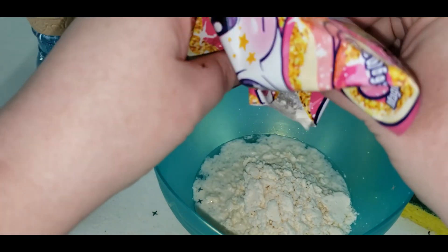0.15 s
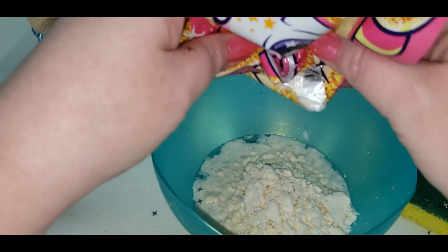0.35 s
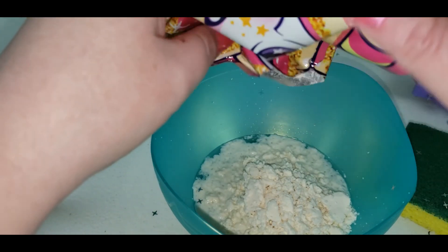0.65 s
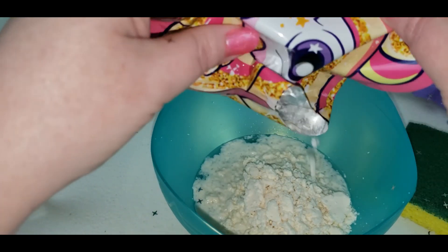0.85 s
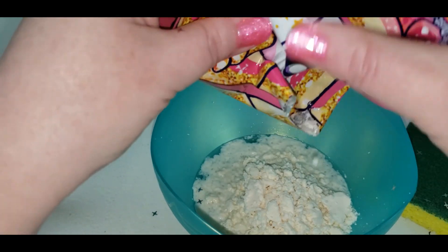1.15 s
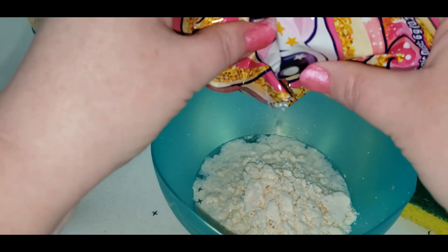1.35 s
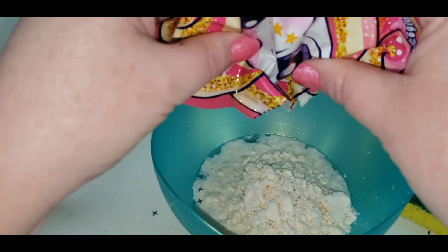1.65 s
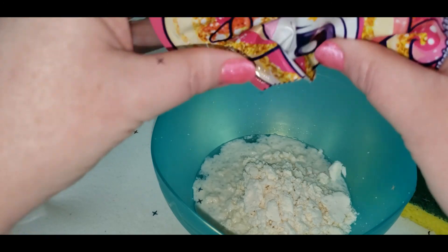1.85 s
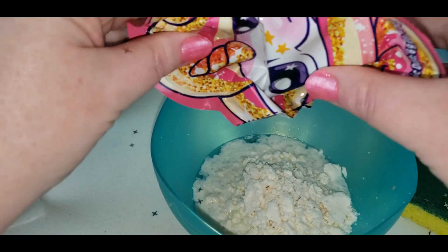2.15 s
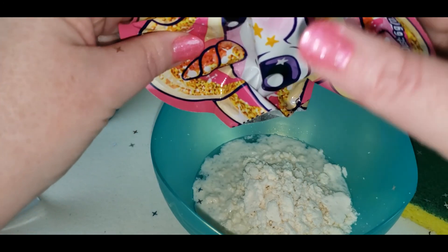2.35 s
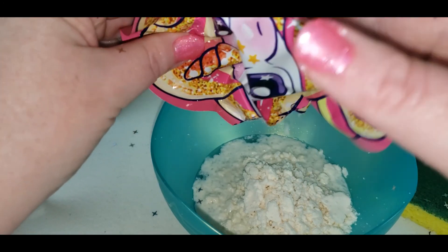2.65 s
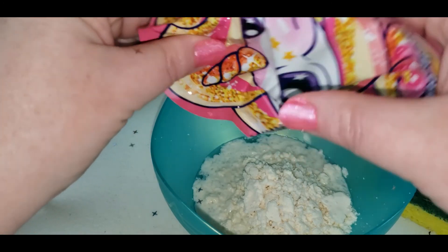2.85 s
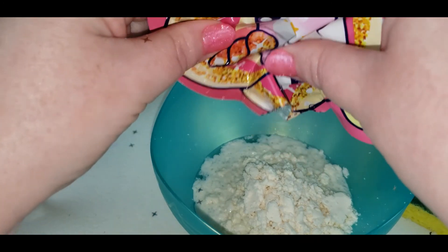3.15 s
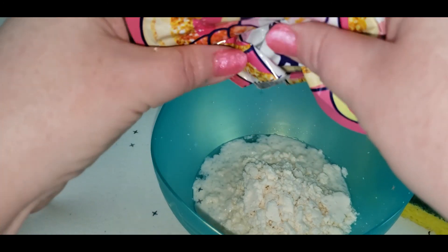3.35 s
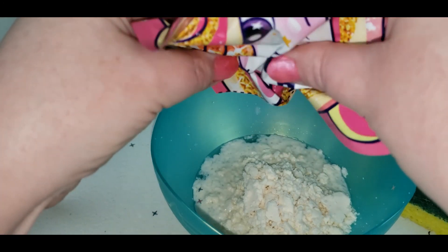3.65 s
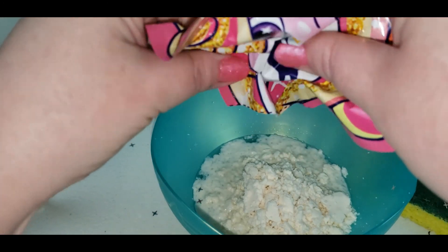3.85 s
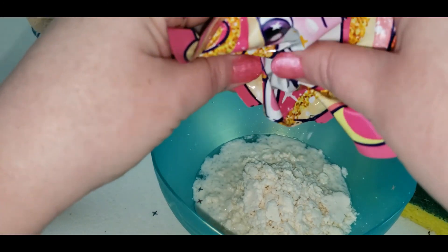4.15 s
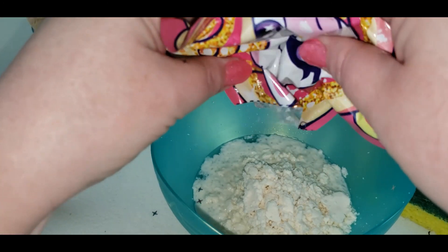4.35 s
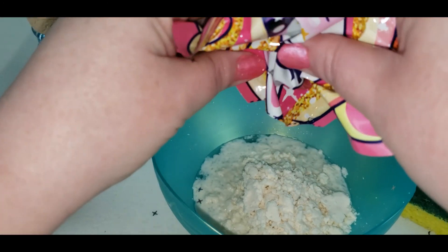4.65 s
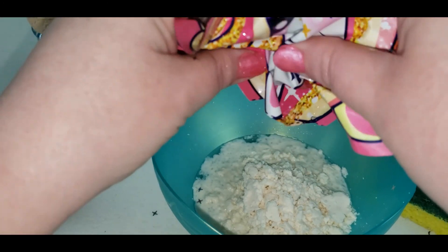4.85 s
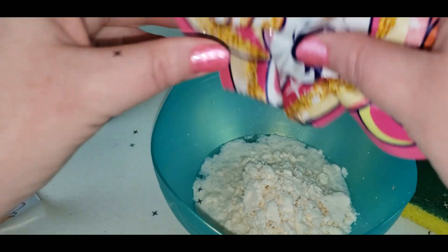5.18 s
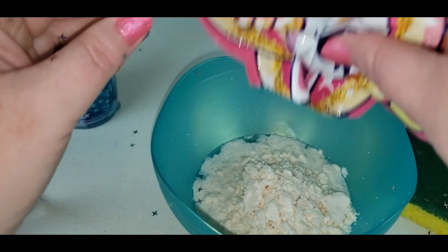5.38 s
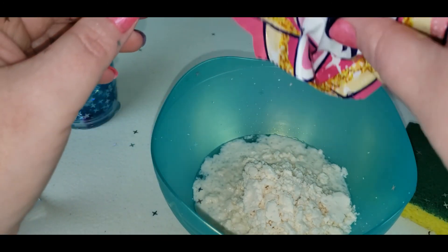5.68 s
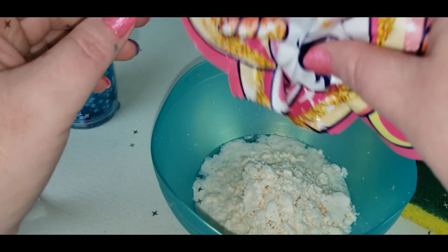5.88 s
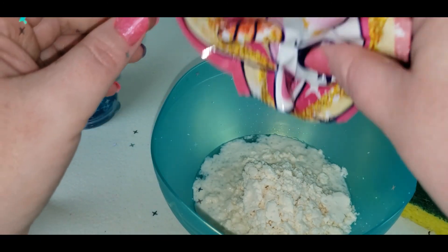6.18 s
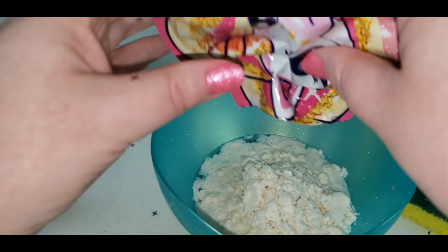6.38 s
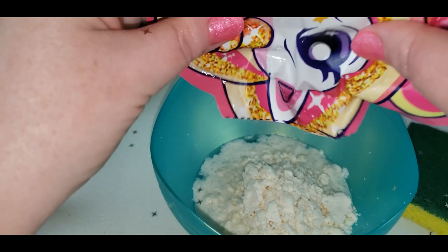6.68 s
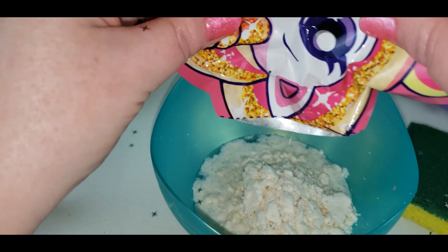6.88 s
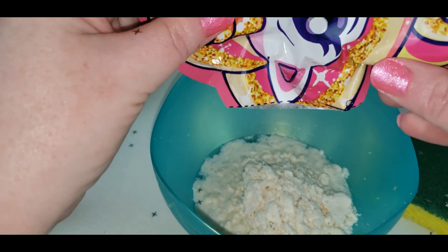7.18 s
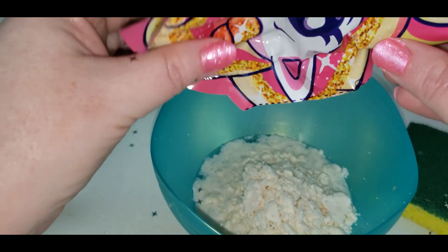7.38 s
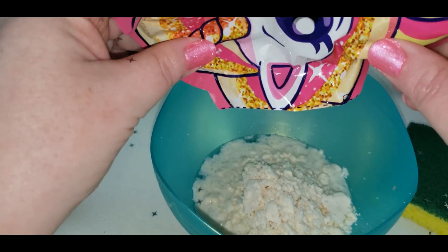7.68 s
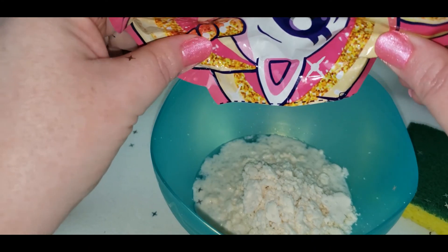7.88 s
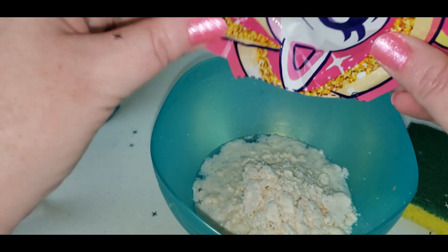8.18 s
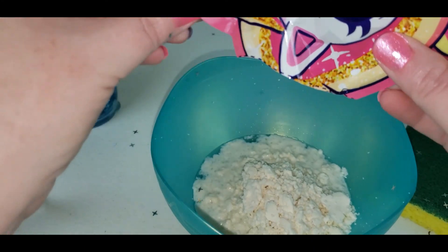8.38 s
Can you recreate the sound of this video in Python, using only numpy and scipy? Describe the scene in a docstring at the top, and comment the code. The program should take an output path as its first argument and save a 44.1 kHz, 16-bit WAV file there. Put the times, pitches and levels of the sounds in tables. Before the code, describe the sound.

Close, crisp crinkling of a plastic pouch in uneven bursts, building to dense crackling, then pausing and returning as scattered snaps in a small room.

```python
"""A foil-lined plastic sachet is squeezed and shaken by two hands over a plastic bowl, close by, in a small
room. Creases snap at set times, loud ones and faint lone ones, as runs of slips that ring the film; small ones
join in. Random ticks and a soft hiss make the fine crinkle, and film slides over film in quick zips of run-
together ticks. Fingers knock on the taut pouch, and once on the bowl, in short rings; the pouch thumps softly
as puffs of low noise, and palms rub it. Noise-like echoes answer from bowl, table and room, over steady
coloured background noise and faint mains hum."""
import sys
import numpy as np
from scipy import signal
from scipy.fft import rfft, irfft
from scipy.io import wavfile

SR = 44100
rng = np.random.default_rng(int(sys.argv[2]) if len(sys.argv) > 2 else 0)


def generate_wav(sig):
    """Save sig (samples, or channels by samples) to the path in sys.argv[1] as 16-bit PCM at SR."""
    pcm = np.round(np.clip(np.atleast_2d(sig).T, -1, 1) * 32767).astype(np.int16)
    wavfile.write(sys.argv[1], SR, pcm)


N = 376173
TIME = np.arange(N) / SR


def from_db(db):
    """Turn decibels into a gain."""
    return 10 ** (np.asarray(db) / 20)


def rms_one(x):
    """Scale a sound to unit power."""
    return x / np.sqrt(np.mean(x ** 2) + 1e-20)


def band(x, low_hz, high_hz, order=2):
    """Keep only the pitches between two limits."""
    limits = [low_hz, min(high_hz, SR / 2 - 100)]
    return signal.sosfilt(signal.butter(order, limits, "band", fs=SR, output="sos"), x)


def resonate(x, hz, width_hz):
    """Ring at one pitch, with gain 1 at the peak; a narrower width rings longer."""
    r = np.exp(-np.pi * width_hz / SR)
    top = np.array([1, 0, -1]) * (1 - r * r) / 2
    bottom = [1, -2 * r * np.cos(2 * np.pi * hz / SR), r * r]
    return signal.lfilter(top, bottom, x + 1e-18)


def coloured_noise(spectrum, size):
    """Make noise of unit power whose spectrum follows a table of pitch and level."""
    hz, db = np.transpose(spectrum)
    bins = np.maximum(np.fft.rfftfreq(size, 1 / SR), 1)
    gain = from_db(np.interp(np.log(bins), np.log(hz), db))
    return rms_one(irfft(rfft(rng.standard_normal(size)) * gain, size))


def add(out, s, sound):
    """Mix a sound in at its time in seconds."""
    start = int(np.clip(round(s * SR), 0, N - 1))
    out[start:start + len(sound)] += sound[:N - start]


# Creases that snap at set times, loud ones and faint lone ones;
# hollow body and sharp edge are relative to level_db, before a shared trim:
# start_s, level_db, pitch_hz, hollow_body_db, sharp_edge_db
PLACED_CREASES = [(0.0186, -32.5, 2590, -15, -11.5), (0.0384, -30, 3990, -16.5, -16.5),
                  (0.055, -24, 4030, -19, -4.5), (0.0816, -29, 4690, -26, -9.5),
                  (0.0993, -23.5, 5380, -15, -6), (0.1448, -29.5, 3350, -9, 2),
                  (0.2616, -24, 4050, -12, -7), (0.2879, -32, 4210, -6.5, -15.5),
                  (0.3194, -30.5, 4040, -6, -10), (0.3325, -19.5, 5000, -24.5, -10.5),
                  (0.3524, -20.5, 6000, -27.5, -7), (0.3737, -30.5, 5290, -22.5, -5),
                  (0.3873, -21, 5510, -18.5, -16), (0.4347, -31, 2240, -1, -34),
                  (0.5735, -32.0, 4150, -8, -31.5), (0.621, -42, 2590, 3.5, -21.5),
                  (0.7047, -25.5, 2770, -12, -19), (0.744, -32.5, 2550, -8, -14.5),
                  (0.756, -42, 2950, -12, 7), (0.7992, -21.5, 3690, -9, -7),
                  (0.814, -20, 2850, -15.5, -7.5), (0.9307, -30.5, 4170, -14, -7.5),
                  (0.9833, -26.5, 2810, -11.5, -18), (1.0147, -21, 4580, -9, -10),
                  (1.072, -32.5, 3790, -24, -24), (1.1168, -34.5, 3510, -12, 1),
                  (1.1307, -30, 3250, -18, -27), (1.235, -30, 5250, -9.5, -7.5),
                  (1.2533, -29.5, 4300, -22.5, -11), (1.2856, -23, 3680, -33.5, -23),
                  (1.2983, -30.5, 3400, -11, -24), (1.3287, -27.5, 3500, -20, -4.5),
                  (1.3884, -20, 3500, -14, -12.5), (1.4178, -18, 3900, -8, -8),
                  (1.4282, -15.5, 3640, -22.5, -8), (1.4701, -24, 3750, -11.5, -13),
                  (1.4834, -36, 4560, -14.5, -9), (1.5345, -30, 3800, -11, -18),
                  (1.5663, -25, 4320, -28, -5.5), (1.7338, -26, 3790, -17.5, -12),
                  (1.7533, -31.5, 4260, -11.5, -3), (1.7716, -34, 3570, -10, -11.5),
                  (1.8121, -31.5, 3600, -13, -16), (1.8349, -35, 4140, -10.5, -12),
                  (1.8771, -38.5, 2830, -10.5, -17), (1.941, -25, 5730, -19, -18),
                  (2.0017, -30.5, 4200, -15, -31), (2.0142, -33, 3880, -10.5, -26),
                  (2.0618, -28.5, 4850, -9, -38), (2.1062, -28, 3860, -17, -8.5),
                  (2.2147, -46, 2510, -2.5, -12), (2.4588, -40.5, 4820, -27, -10),
                  (2.4843, -14, 4280, -18, -11), (2.552, -35.5, 4760, -19, -1),
                  (2.6346, -38.5, 4730, -6.5, -12), (2.6913, -29.5, 4220, -15.5, -28),
                  (2.8184, -28, 3180, -9, -28), (2.9744, -20, 3880, -16, -19),
                  (2.9906, -37.5, 4150, -23, -4), (3.09, -29.5, 3460, -11.5, -2),
                  (3.1013, -30, 3870, -27, -12.5), (3.1141, -20.5, 4910, -36, -3.5),
                  (3.1591, -26.5, 4960, -16.5, -4), (3.2087, -32.5, 4860, -13.5, -24.5),
                  (3.2702, -37.5, 3120, -6.5, 1), (3.2921, -25.5, 3970, -11, -22),
                  (3.3068, -29, 3610, -11.5, -10), (3.327, -18, 3430, -13.5, -26.5),
                  (3.3637, -18.5, 3690, -16.5, -9), (3.3839, -23.5, 2570, -10.5, -7.5),
                  (3.4443, -19, 4750, -14.5, -27.5), (3.4612, -20, 4850, -17, -12),
                  (3.4806, -19.5, 4340, -15.5, -8.5), (3.5211, -32.5, 3010, -3, -10.5),
                  (3.562, -29, 4460, -6, -4), (3.578, -22, 4170, -8.5, -16.5),
                  (3.6069, -24.5, 3870, -6, -10), (3.6278, -25, 5320, -13.5, -8.5),
                  (3.6686, -19, 4450, -12.5, -13.5), (3.6935, -19.0, 3590, -12.5, -5.5),
                  (3.7151, -23.5, 4290, -14.5, -16.5), (3.732, -15.5, 4010, -21.5, -29),
                  (3.7657, -22, 4060, -14, -9.5), (3.7891, -29.5, 4280, -19, -8),
                  (3.8533, -27.5, 4940, -29, 1), (3.8682, -24, 3930, -25.5, -19),
                  (3.892, -24.5, 5250, -31.5, -2.5), (3.9099, -13, 3930, -30.5, -14),
                  (3.9429, -20.5, 4610, -7, -5.5), (4.0525, -18.5, 3580, -14.5, -20),
                  (4.0633, -29.0, 4210, -19, -1.5), (4.076, -16, 5860, -26, -3),
                  (4.0998, -25, 4020, -24.5, -12.5), (4.115, -20, 3830, -8.5, -15),
                  (4.1562, -22.5, 4240, -30, -5), (4.184, -30, 4590, -23, 2.5),
                  (4.2267, -22, 4640, -45.5, -4.5), (4.243, -24.0, 4040, -36, -0.5),
                  (4.3221, -16, 3500, -28, -8), (4.3433, -22, 4310, -28, -10.5),
                  (4.3682, -18, 3660, -17.5, -7.5), (4.4182, -32.5, 4720, -19.5, -9),
                  (4.4497, -24.5, 4450, -22.5, -7.5), (4.464, -35.5, 5080, -19, -3.5),
                  (4.4973, -16, 4420, -15.5, -10), (4.515, -21, 3230, -21, 3),
                  (4.5298, -20.5, 4860, -26, -2.5), (4.548, -18.5, 2960, -32, 0),
                  (4.6488, -28, 5230, -46, -0.5), (4.663, -32.5, 3110, -15, 0),
                  (4.731, -21, 4330, -15.5, -5), (4.746, -24, 4480, -26, -14), (4.777, -29, 4210, -33, -1),
                  (4.8098, -22.5, 3310, -16, -15), (4.8197, -27.5, 3760, -24, -1.5),
                  (4.851, -33, 3330, -24, 10), (4.9965, -30, 5060, -20, -21), (5.0135, -34.5, 3020, -5, 1),
                  (5.0422, -27, 4640, -27, -14), (5.4598, -60.5, 3410, -11, -16),
                  (5.9328, -39, 4830, -22.5, -20), (5.9675, -37.5, 2720, -7.5, -7),
                  (6.2084, -65.5, 2550, 4.5, -31), (6.2568, -51, 3750, -5, -4),
                  (6.2688, -55, 2880, -8, -11), (6.353, -55, 3780, -16, -16),
                  (6.4095, -27, 3960, -18.5, -11), (6.4898, -26, 3920, -15, -7.5),
                  (6.5255, -30, 5010, -12, -6), (6.5411, -20.5, 4650, -13, -9.5),
                  (6.6535, -37, 5040, -5, -13), (6.6641, -30.5, 3460, -8, -12),
                  (6.696, -32.5, 3260, 1.5, 6.5), (6.7635, -17.5, 4010, -12, -5),
                  (6.8713, -40, 2240, 5, -35), (7.2216, -30, 3590, -16, -17),
                  (7.2445, -37, 3940, -8.5, -1.5), (7.4743, -53, 6090, -19, -3),
                  (7.5103, -46, 4140, -10.5, -8), (7.6062, -54.5, 5130, -7, 3),
                  (7.6349, -29, 5390, -18, -10), (7.6529, -29, 4420, -16.5, -21),
                  (7.7285, -23.5, 5920, -16.5, -3.5), (7.7393, -28.5, 3880, -5, -6),
                  (7.892, -51.5, 3350, -2.5, -36), (7.9458, -58, 2000, 2, -39),
                  (7.9552, -41.5, 3050, -2, -9), (8.0503, -33, 4060, -29, -23),
                  (8.0995, -45, 2990, -2, -8.5), (8.1081, -34.5, 3680, -13, -15),
                  (8.1189, -30, 4080, -19, -19), (8.213, -54.0, 3500, -19, -14),
                  (8.2726, -53.5, 4100, -21, -20), (8.3115, -42, 4170, -7, -37),
                  (8.3792, -47, 3700, -0.5, -26), (8.5189, -57, 2630, 0.5, -25)]
STRAIN_S = .0035   # time over which a crease creaks before it gives way
RUN_SPREAD_DB = 4.5   # scatter in the length of a run of slips


def snaps(creases, slip_s=0.0017, first_slip=.75, slips_per_s=26000, scatter_db=-8.5, scatter_s=0.0068,
          strain_db=-23, sag_db=-7.5, sag_s=0.00081, snap_s=0.0035, body_db=-2.0, edge_db=-2.0,
          dulling=.25, firm_db=-25, size=1400):
    """A crease creaks, then gives way in a run of slips that shake its facet, the pouch and the film's edge."""
    lead = size // 4
    t, out = (np.arange(size) - lead) / SR, np.zeros(N)
    draws = rng.standard_normal((len(creases), 3, size))
    slip_noise, body_noise, chance = draws[:, 0], draws[:, 1], draws[:, 2]
    slipping = rng.random((len(creases), size)) < slips_per_s / SR
    run_s = slip_s * from_db(RUN_SPREAD_DB * np.clip(chance[:, :1], -2, 2))
    # the folds and hands scatter each snap differently, as their shape keeps changing
    scattered = from_db(scatter_db) * np.exp(-abs(t) / scatter_s)
    fading = (t >= 0) * (np.exp(-abs(t) / run_s) + scattered)
    straining = (t < 0) * from_db(strain_db) * np.exp(-abs(t) / STRAIN_S)
    slips = slip_noise * slipping * (fading + straining)
    slips[:, lead] = first_slip * np.sign(chance[:, 1])
    # the wall of the pouch starts to sag just before the crease goes
    sagging = (t < 0) * from_db(sag_db) * np.exp(-abs(t) / sag_s)
    broad = band(slips, 1700, 7500)
    body = band(body_noise * (fading + sagging), 200, 1600)
    edge = band(slips, 4000, 9840) - from_db(-16.5) * band(slips, 9000, 23000)
    unit = np.sqrt(snap_s * SR / size)   # the level is the power over the snap's own length
    for k, (s, db, hz, hollow_db, crisp_db) in enumerate(creases):
        dull_db = dulling * min(db - firm_db, 0)   # gentle snaps are duller
        snap = facet_ring(broad[k], hz, chance[k, -3:])
        snap += from_db(hollow_db + body_db) * rms_one(body[k])
        snap -= from_db(crisp_db + edge_db + dull_db) * rms_one(edge[k])
        add(out, s + t[0], from_db(db) * unit * snap)
    return out


def facet_ring(shake, hz, overtones, facet_q=2.3, broad_db=-10.5, overtone_db=-7.5, overtone_q=8,
               overtone_spread=.3):
    """A facet of film rings broadly at its pitch, with a few sharper modes set by its chance shape."""
    modes_hz = np.clip(hz * np.exp(overtone_spread * overtones), 1200, 9000)
    modes = sum(rms_one(resonate(shake, mode_hz, mode_hz / overtone_q)) for mode_hz in modes_hz)
    ring = rms_one(resonate(shake, hz, hz / facet_q))
    ring = ring + from_db(broad_db) * rms_one(shake)
    return rms_one(ring + from_db(overtone_db) * rms_one(modes))


# The fingers squeeze the sachet; the level guides the fine crinkle: start_s, length_s, level_db
SQUEEZES = [(0.04, 0.11, -36), (0.26, 0.2, -42), (0.69, 0.13, -42.5), (0.99, 0.16, -38.5),
            (1.26, 0.31, -38), (1.74, 0.37, -61.5), (2.49, 0.2, -55.5), (2.78, 0.06, -47),
            (2.98, 0.23, -41), (3.3, 0.19, -40.5), (3.56, 0.24, -35), (3.86, 0.08, -39.5),
            (4.06, 0.31, -41), (4.46, 0.09, -37.5), (4.74, 0.15, -42), (5, 0.11, -42.5), (5.46, 0.29, -87),
            (6.21, 0.15, -75), (6.48, 0.07, -38), (6.66, 0.25, -53), (7.13, 0.12, -70.5), (7.48, 0.03, -63),
            (7.7, 0.08, -45.5), (7.96, 0.16, -50.5), (8.2, 0.2, -78)]
GRIP_DB_PER_S, RELAX_DB_PER_S = 698, 284.5   # how fast the fingers take hold and let go


def effort(s):
    """Guide level in dB at given times: each squeeze takes hold, holds and relaxes; the strongest one counts."""
    start, length, db = np.transpose(SQUEEZES)[:, :, None]
    before_s = np.maximum(start - s, 0)
    after_s = np.maximum(s - start - length, 0)
    return np.max(db - GRIP_DB_PER_S * before_s - RELAX_DB_PER_S * after_s, axis=0)


FACET_HZ, FACET_SPREAD_OCTAVES = 3800, 0.35   # pitch of a small crease, and how they differ
SMALL_DB, SMALL_SPREAD_DB = 4, 4.5   # level relative to the effort, and scatter of level and hollow body
SMALL_HOLLOW_DB = -12.5   # hollow body relative to each crease's level, before the shared trim


def small_creases(edge_db=-14, edge_db_per_octave=5, count=380):
    """Small creases give way at uneven intervals, as hard as the fingers press; higher ones are crisper."""
    s = (np.arange(count) + rng.random(count)) / count * N / SR
    strength, smallness, body = np.clip(rng.standard_normal((3, count)), -2, 2)
    octaves = FACET_SPREAD_OCTAVES * smallness
    level_db = effort(s) + SMALL_DB + SMALL_SPREAD_DB * strength
    hollow_db = SMALL_HOLLOW_DB + SMALL_SPREAD_DB * body
    sharp_db = edge_db + edge_db_per_octave * octaves
    return np.transpose([s, level_db, FACET_HZ * 2 ** octaves, hollow_db, sharp_db])   # as PLACED_CREASES


# the wrinkles' rate in dB rises by this share of the effort above a light touch
RATE_FOLLOWS, LIGHT_TOUCH_DB = .26, -55
RUB_DB = -14   # hiss of rubbing film relative to the effort, before the last filter


def crinkle(light_touch_wrinkles_per_s=420, spread_db=6.0, wrinkle_db=-6.0, facet_q=1.4, top_hz=10500,
            count=12):
    """Tiny wrinkles tick at random, more often under harder kneading, over the soft hiss of rubbing film."""
    effort_db = effort(TIME)
    rate = light_touch_wrinkles_per_s * from_db(RATE_FOLLOWS * (effort_db - LIGHT_TOUCH_DB))
    sizes = from_db(spread_db * np.minimum(rng.exponential(1, N), 3.5)) * rng.choice([-1, 1], N)
    ticks = sizes * (rng.random(N) < rate / SR) / np.sqrt(rate)   # power stays even as the rate changes
    # each tick is dealt to one of several facets with its own pitch
    dealt = rng.integers(0, count, N)
    facets = np.zeros(N)
    for k, hz in enumerate(np.geomspace(1700, 7000, count)):
        facets += resonate(ticks * (dealt == k), hz, hz / facet_q)
    wrinkles = rms_one(band(facets + from_db(-17.0) * ticks, 170, 9000, order=1))
    rub = rms_one(band(rng.standard_normal(N), 2800, 5500, order=1))
    rustle = from_db(wrinkle_db) * wrinkles + from_db(RUB_DB) * rub
    return from_db(effort_db) * band(rustle, 100, top_hz)   # small wrinkles lack a real crease's hard edge


# Film sliding over film in a quick zip; it swells and fades over length_s either side of its height:
# height_s, length_s, level_db, pitch_hz
SLIDES = [(1.44, 0.011, -52, 3800), (3.703, 0.03, -27, 4400), (4.878, 0.027, -32, 4100),
          (5.497, 0.033, -73.5, 3500), (5.726, 0.012, -67.5, 828), (0.256, 0.0071, -37, 1870),
          (0.648, .03, -51, 2823), (7.145, 0.019, -62, 4370), (7.199, .02, -58.5, 4350),
          (7.495, 0.01, -48.5, 4770), (6.269, 0.023, -64, 3020), (7.75, 0.0078, -52, 4500)]


def slides(catches_per_s=3000, facet_q=1.6):
    """Two layers of film catch and let go so fast that the ticks run together."""
    out = np.zeros(N)
    catches = band(rng.standard_normal(N) * (rng.random(N) < catches_per_s / SR), 900, 11000)
    for s, length_s, db, hz in SLIDES:
        swell = np.exp(-((TIME - s) / length_s) ** 2)
        out += from_db(db) * swell * rms_one(resonate(catches, hz, hz / facet_q))
    return out


# Fingers knocking on the taut pouch, and once on the bowl (2.816 s); level is before the rise and decay:
# start_s, level_db, pitch_hz
KNOCKS = [(0.051, -31, 427), (0.262, -39, 300), (0.705, -37, 290), (2.48, -32.5, 310), (2.816, -27.5, 493),
          (3.448, -29, 510), (4.113, -31.5, 477), (6.695, -31, 320), (6.764, -32, 375), (6.764, -21, 1820),
          (6.869, -44.5, 395), (7.772, -29.5, 318), (8.308, -42, 392)]


def knocks(decay_s=0.0041, rise_s=0.00044, size=4096):
    """A taut panel of the pouch, or the bowl, rings for a few cycles, damped by the fingers."""
    t, out = np.arange(size) / SR, np.zeros(N)
    shape = (1 - np.exp(-t / rise_s)) * np.exp(-(t / (2 * decay_s)) ** 2)
    for s, db, hz in KNOCKS:
        add(out, s, from_db(db) * np.sin(2 * np.pi * hz * t) * shape)
    return out


# The whole pouch flexing or being tapped; peak level before a shared trim: start_s, level_db
THUMPS = [(0.308, -48), (0.419, -45.5), (0.654, -44), (0.707, -47), (1.02, -45), (2.462, -47), (2.509, -44),
          (2.624, -37.5), (2.7, -49), (3.366, -40), (4.483, -46), (5.059, -46), (6.511, -41), (6.752, -33),
          (7.233, -46.5), (7.692, -44), (8.044, -42.5), (8.099, -44), (8.159, -50)]


def thumps(rise_s=0.0012, decay_s=0.021, trim_db=1.5, size=8192):
    """The powder-filled pouch pushes a dull puff of air when it flexes."""
    t, out = np.arange(size) / SR, np.zeros(N)
    shape = (1 - np.exp(-t / rise_s)) * np.exp(-t / decay_s)
    pushes = rng.standard_normal((len(THUMPS), size)) * shape
    puffs = band(band(pushes, 42, 105, order=1), 35, 550)
    for (s, db), puff in zip(THUMPS, puffs):
        add(out, s, from_db(db + trim_db) * puff / np.abs(puff).max())
    return out


def handling(rub_db=-63.0, pressed_db=-45, follows=.28, uneven_db=3, shifts_per_s=14):
    """Palms shift on the pouch with a low, uneven rub that grows with the effort."""
    steps = rng.standard_normal(1000)
    uneven = np.interp(TIME * shifts_per_s, np.arange(len(steps)), steps)
    swell_db = follows * (effort(TIME) - pressed_db) + uneven_db * uneven
    return from_db(rub_db + swell_db) * rms_one(band(rng.standard_normal(N), 100, 570))


# Resonances of the pouch, cupped hands and bowl, added to the plain sound: pitch_hz, width_hz, gain_db
HOLLOW = [(310, 130, -2.5), (507, 70, -3), (961, 180, 4), (1553, 450, 0), (1840, 64, -8.5),
          (2456, 65, -2.5), (2845, 60, -32.5), (3570, 270, -12.5)]


def hollow(x):
    """The air held by pouch, hands and bowl rings briefly along."""
    return x + sum(from_db(db) * resonate(x, hz, width_hz) for hz, width_hz, db in HOLLOW)


# Colour of the room's echo, relative levels: pitch_hz, level_db
ECHO_COLOUR = [(100, 0), (400, 5.5), (1200, 0), (4000, -4.5), (9000, -3.5), (16000, 1.5)]
ROOM_T60_S = 0.29   # time for the tail to fall by 60 dB


def room(x, near_db=-11.0, near_s=0.0077, first_s=0.0035, tail_db=-10.0, build_s=0.0018, turns_per_s=1.5,
         size=20000, count=4):
    """Quick reflections off bowl and table, then the room's short tail; echoes shift as the sachet turns."""
    t, out = np.arange(size) / SR, x
    for k in range(count):
        # each direction has its own echoes, heard while the sachet faces that way
        facing = np.maximum(np.cos(2 * np.pi * (turns_per_s * TIME - k / count)), 0)
        near = rng.standard_normal(size) * (t > first_s) * np.exp(-t / near_s)
        fade = (1 - np.exp(-t / build_s)) * from_db(-60 * t / ROOM_T60_S)
        tail = coloured_noise(ECHO_COLOUR, size) * fade
        echoes = from_db(near_db) * rms_one(near) + from_db(tail_db) * rms_one(tail)
        out = out + signal.fftconvolve(x * facing, echoes / np.sqrt(size))[:N]
    return out


# Colour of the steady background noise, relative levels: pitch_hz, level_db (per Hz)
FLOOR = [(25, -24), (50, -10.5), (85, -11), (200, -25.5), (330, -22.5), (560, -41.5), (750, -36.5),
         (1350, -55), (2250, -41.5), (3000, -48), (3600, -40.5), (8500, -41.5), (11000, -51.5),
         (16000, -54.5)]
FLOOR_DB = -67   # overall level of the background noise
# Mains hum: pitch_hz, level_db (rms)
HUM = [(59.6, -64), (119.5, -80.5), (300, -86)]


def background():
    """Steady coloured background noise lies under all, with mains hum as a few steady sines."""
    hum = np.zeros(N)
    for hz, db in HUM:
        hum += from_db(db) * np.sqrt(2) * np.sin(2 * np.pi * (hz * TIME + rng.random()))
    return hum + from_db(FLOOR_DB) * coloured_noise(FLOOR, N)


def scene(knock_room_db=-7):
    """The sachet in its room; puffs are heard close up only, and knocks mostly so."""
    film = hollow(snaps(PLACED_CREASES) + snaps(small_creases()) + crinkle() + slides())
    knocking = knocks()
    carried = from_db(knock_room_db) * knocking   # the part of the knocks that reaches the room
    echoing = room(film + carried) - carried      # film with its echoes, and the knocks' echoes alone
    return (echoing + knocking + thumps() + handling() + background())[None]


def record(dry, ceiling=.8, cutoff_hz=16000):
    """The microphone rounds the tallest peaks, and the top is cut steeply."""
    rounded = ceiling * np.tanh(dry / ceiling)
    return signal.sosfilt(signal.ellip(10, .1, 80, cutoff_hz, fs=SR, output="sos"), rounded)


dry = scene()
out = record(dry)
generate_wav(out)
```